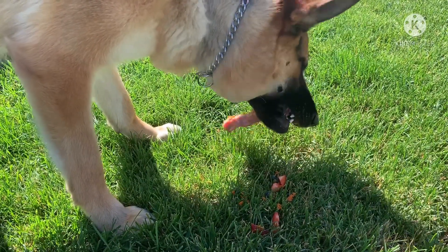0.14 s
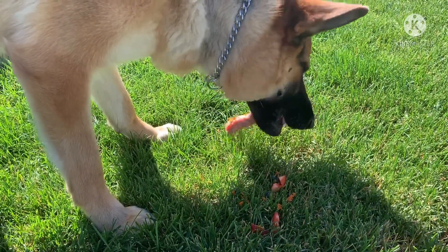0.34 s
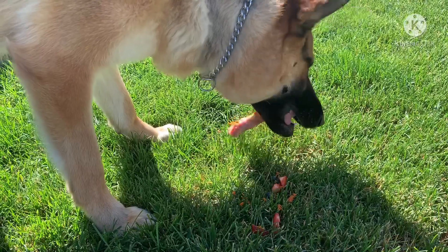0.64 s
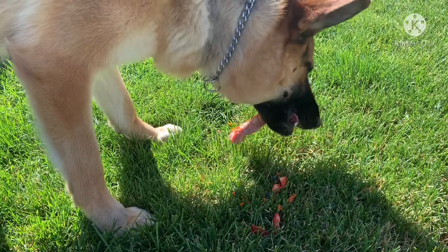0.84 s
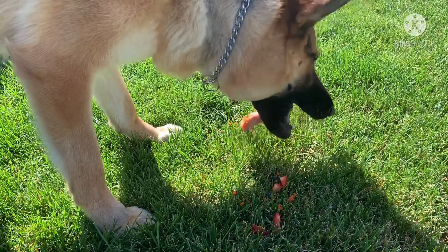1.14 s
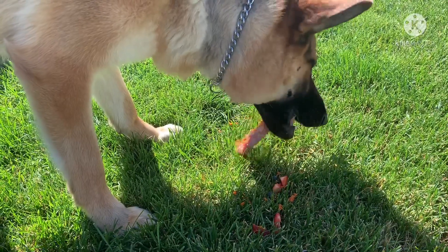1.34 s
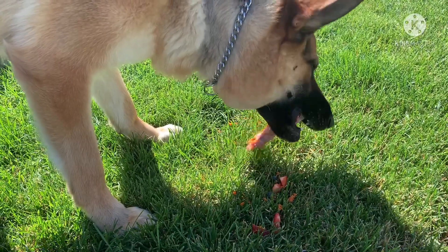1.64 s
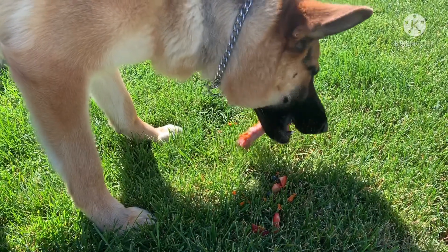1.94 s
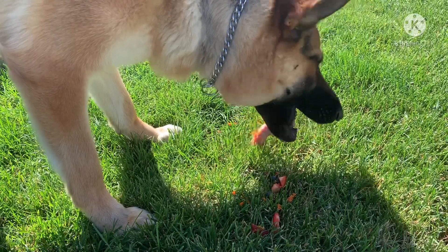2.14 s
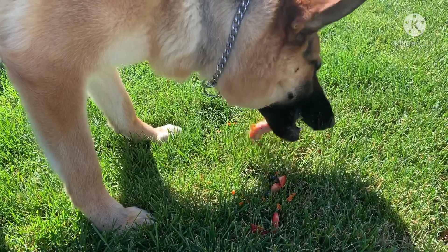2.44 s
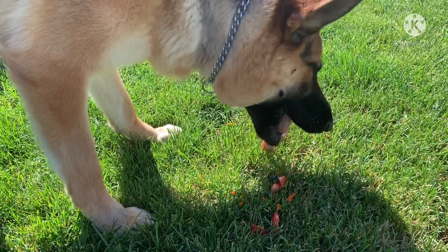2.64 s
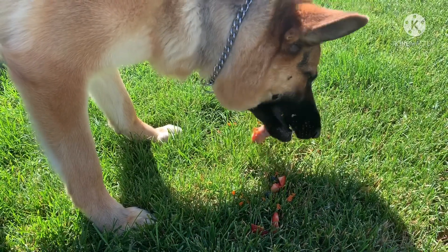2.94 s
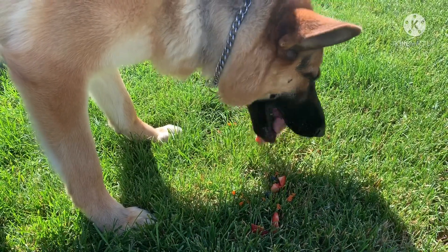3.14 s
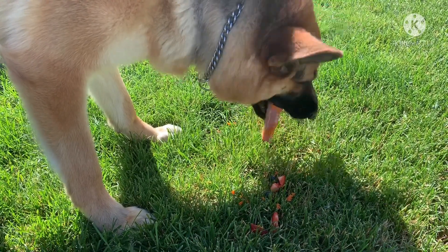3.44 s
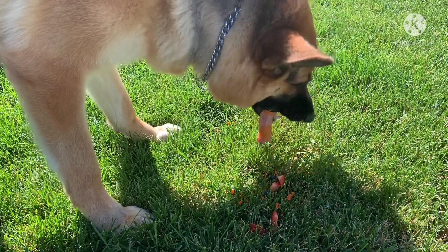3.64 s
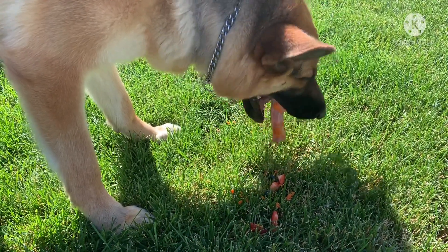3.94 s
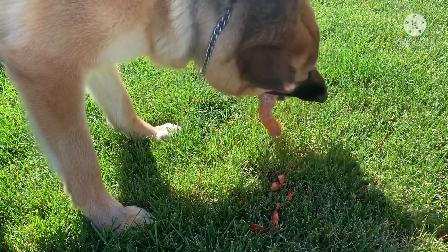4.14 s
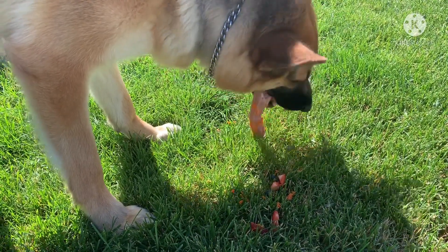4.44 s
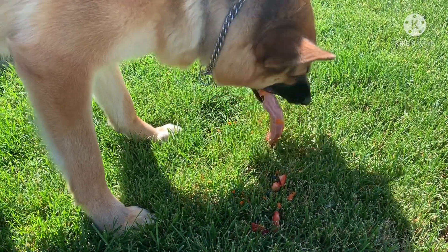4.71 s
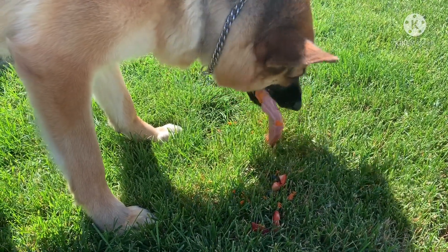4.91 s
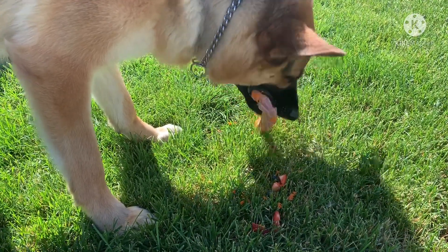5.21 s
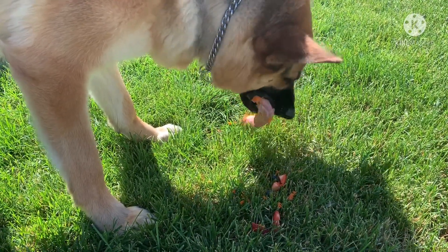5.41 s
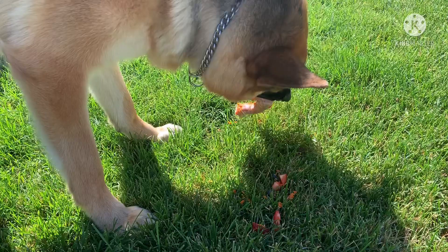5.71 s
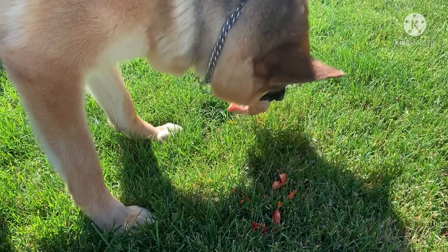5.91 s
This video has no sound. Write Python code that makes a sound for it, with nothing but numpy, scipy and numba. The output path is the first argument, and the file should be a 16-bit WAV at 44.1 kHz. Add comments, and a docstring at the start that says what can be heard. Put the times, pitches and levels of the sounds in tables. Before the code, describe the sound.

A dog chews raw meat up close with sharp crunches and wet smacks, while wind rumbles steadily on the microphone.

```python
"""Wind rumbles on a phone's two microphone ports while a dog, a metre away on a lawn, chews raw meat.
Each bite through gristle cracks and rings down in the closing mouth; splinters tick, wet flesh
squelches and air puffs through the nose. Single eddies slap the ports, and behind it all sit
the hum of a cooling unit and the wash of a suburb."""
import sys
import numpy as np
from scipy import signal
from scipy.fft import rfft, irfft, next_fast_len
from scipy.io import wavfile
from scipy.ndimage import uniform_filter1d
from numba import njit

SR = 44100
rng = np.random.default_rng(int(sys.argv[2]) if len(sys.argv) > 2 else 0)


def put_to_file(sound):
    """Save the sound as 16-bit audio at rate SR, in the file named by the first command-line argument."""
    columns = np.atleast_2d(sound).T  # one column per channel
    safe = np.clip(columns, -1, 1)
    whole_steps = np.round(safe * 32767)
    wavfile.write(sys.argv[1], SR, whole_steps.astype(np.int16))


N = 267545
T = np.arange(N) / SR
USUAL_DB = -35  # level of a usual bite and of the usual rumble


def undb(db):
    return 10 ** (np.asarray(db) / 20)


def unit(x):
    """Scale to rms 1."""
    return x / np.sqrt(np.mean(x ** 2))


def curves(table):
    """Columns of a table, joined by straight lines in time."""
    times, *columns = np.transpose(table)
    return [np.interp(T, times, column) for column in columns]


def over_hz(table, hz):
    """Read a (freq_hz, value) table on a log frequency axis."""
    freqs, values = np.transpose(table)
    return np.interp(np.log(hz), np.log(freqs), values)


def band(x, lo_hz, hi_hz, order=2):
    sos = signal.butter(order, [lo_hz, min(hi_hz, .45 * SR)], "bandpass", fs=SR, output="sos")
    return signal.sosfilt(sos, x)


def grains(shape, lo_hz, hi_hz):
    """Rows of band noise, one for each event."""
    return unit(band(rng.standard_normal(shape), lo_hz, hi_hz, order=3))


def stereo_noise(likeness):
    """Left and right noise, from unrelated (0) to identical (1)."""
    mid, side = rng.standard_normal((2, N))
    return np.sqrt((1 + likeness) / 2) * mid + np.sqrt((1 - likeness) / 2) * np.array([side, -side])


def walk(rate_hz):
    """Random levels held 1 / rate_hz seconds and smoothed twice; spread near 1."""
    hold = int(SR / rate_hz)
    steps = np.repeat(rng.standard_normal(N // hold + 1), hold)
    return 1.5 * uniform_filter1d(uniform_filter1d(steps, hold), hold)[:N]


def add(out, start_s, grain):
    """Mix a grain in at start_s."""
    i = int(start_s * SR)
    grain, i = grain[max(-i, 0):], max(i, 0)
    out[i:i + len(grain)] += grain[:len(out) - i]


@njit
def resonate(x, hz, width_hz):
    """State-variable band-pass whose centre moves."""
    y, band_state, low_state = np.empty(len(x)), 0., 0.
    for i in range(len(x)):
        g, damping = np.tan(np.pi * hz[i] / SR), width_hz / hz[i]
        v = (band_state + g * (x[i] - low_state)) / (1 + g * (g + damping))
        band_state, low_state = 2 * v - band_state, low_state + 2 * g * v
        y[i] = damping * v
    return y


def wind(gust_db=2.5, puff_db=3):
    """Eddies tumble over the ports: an uneven rumble, and a flutter that comes in puffs."""
    # strength of the wind on the ports: time_s, rumble_db
    gusts = [(0.0, -35), (0.49, -43), (0.52, -38.5), (0.67, -47), (0.78, -29.5), (0.81, -39), (1.25, -43),
             (1.28, -34.5), (1.37, -41), (1.9, -42), (2.3, -42), (2.6, -40), (2.85, -43.5), (3.02, -36.5),
             (3.2, -40.5), (3.51, -38), (3.6, -27), (3.7, -41), (4.09, -42), (4.17, -34), (4.22, -43.5),
             (4.49, -41.5), (4.81, -40.5), (4.88, -33), (4.93, -34), (5.02, -34), (5.05, -36.5),
             (5.17, -51), (5.27, -42.5), (6.07, -47)]
    rumble_db, = curves(gusts)
    pan_db = .3 + 1.5 * walk(12)  # left minus right
    low, high = stereo_noise(.78), stereo_noise(.6)
    rumble = unit(band(low, 43, 107, order=3)) * undb(rumble_db + gust_db * walk(14))
    flutter_db = -48 + .32 * (rumble_db - USUAL_DB)  # follows the gusts only a little
    flutter = unit(band(high, 92, 286)) * undb(flutter_db + puff_db * walk(40))
    return (rumble + flutter) * undb(np.array([pan_db, -pan_db]) / 2)


def suburb():
    """Far traffic and leaves: third-octave bands that swell together and flicker alone."""
    # tone of the wash before its tilt: freq_hz, relative_db
    spectrum = [(150, -2), (300, -3.5), (500, -7), (1000, -11.5), (2000, -19.5), (3000, -24.5),
                (4500, -24.5), (6300, -40), (7300, -56), (8800, -51.5), (11000, -49), (16000, -79)]
    # slow swell of the wash: time_s, level_db, tilt_db_per_octave
    swell = [(0, -52, 2.5), (.74, -50.5, 3), (2.33, -50.5, 1.3), (4.0, -54, 1), (6.07, -53.5, 1.05)]
    # how alike the wash is at the two ports: freq_hz, likeness (0-1)
    likeness = [(100, 1), (500, 0.98), (2000, 0.35), (2900, 0.3), (4500, 1), (16000, 1)]
    level_db, tilt_db = curves(swell)
    wash = 0
    for hz in 200 * 2 ** np.arange(0, 6.5, 1 / 3):
        noise = band(stereo_noise(over_hz(likeness, hz)), hz * 2 ** (-1 / 6), hz * 2 ** (1 / 6))
        flicker_db = 1.5 * walk(8) + 1.2 * walk(50)
        wash = wash + undb(over_hz(spectrum, hz) + tilt_db * np.log2(hz / 1000) + flicker_db) * noise
    return wash / np.std(band(wash, 187, 6500)) * undb(level_db)


def cooling_hum(waver_db=2.44):
    """A cooling unit's motor drones, wavering as the air moves, a little apart at the two ports."""
    # motor tones: pitch_hz, rms_db
    tones = [(119.8, -42.5), (240, -63.5), (275, -59.5), (360, -66)]
    drift = .7 * walk(12) + .5 * walk(4) * np.array([[1], [-1]])
    return sum(np.sqrt(2) * undb(db + waver_db * walk(12)) * np.sin(2 * np.pi * hz * T + drift)
               for hz, db in tones)


def squelch(pops_per_s=500, juicy_per_s=220, spread_db=2.5, smear_s=.0042, width_hz=480.):
    """Wet flesh bursts in tiny uneven pops: a bright fizz, and fewer juicy ones that ring the mouth."""
    # working of the jaws: time_s, fizz_db, juicy_db, mouth_hz
    chewing = [(0, -74, -62, 1710), (.25, -70, -72, 1760), (.45, -86, -70, 1660), (1.2, -80, -63, 1690),
               (1.65, -71.5, -61, 1810), (1.85, -67, -72, 1700), (1.95, -88, -86, 1600),
               (2.35, -71, -70, 1590), (2.55, -80, -63, 1420), (3.24, -78.5, -61, 1300),
               (3.55, -75, -60.5, 1250), (3.64, -71, -60, 1230), (3.76, -81, -51, 1200),
               (3.8, -84, -64.5, 1210), (4.35, -76.5, -62.5, 1490), (4.55, -82, -68, 1650),
               (4.68, -74, -62.5, 1760), (5.0, -79.5, -64.5, 1510), (6.07, -81.5, -66.5, 1380)]
    fizz_db, juicy_db, mouth_hz = curves(chewing)
    chance = rng.random(N)
    sizes = undb(spread_db * np.minimum(rng.exponential(size=N), 4))
    pops = (chance < pops_per_s / SR) * sizes
    pop_energy = signal.lfilter([1], [1, -np.exp(-1 / (smear_s * SR))], pops ** 2)
    noise = rng.standard_normal(N)
    hiss = band(noise, 7000, 16000, order=3) + .8 * band(noise, 8200, 9400)
    fizz = hiss * np.sqrt(pop_energy + 1e-12)
    mouth_hz = mouth_hz * (1 + .13 * walk(40))  # the tongue never rests
    juicy_pops = (chance < juicy_per_s / SR) * sizes
    juicy = resonate(resonate(juicy_pops, mouth_hz, width_hz), mouth_hz, 2 * width_hz)
    return undb(fizz_db) * unit(fizz) + undb(juicy_db) * unit(juicy)


def buffets(edge_db=-14, edge_ratio=1.72):
    """An eddy slaps both ports, one harder: a short thump of pressure with a sharper edge."""
    # single eddies: peak_s, level_db, pitch_hz, half_width_s
    slaps = [(0.022, -23, 93, 0.0056), (0.34, -45, 162, 0.015), (0.736, -26, 90.5, .006),
             (0.77, -23, 78.5, 0.0029), (1.273, -31, 204, 0.0023), (3.576, -25, 220, 0.0056),
             (3.591, -19.5, 94, 0.0051), (3.624, -36, 153, 0.008), (3.81, -28.5, 128, 0.0056),
             (4.015, -37, 149, 0.017), (4.157, -26, 106, 0.0059), (4.868, -40.5, 271, 0.011),
             (4.871, -27.5, 139, 0.0097), (4.881, -21, 82.5, 0.015), (4.914, -20.5, 75, 0.0061),
             (4.899, -29.5, 202, 0.0076), (4.94, -23, 71.6, 0.016), (4.97, -27, 152, 0.0082),
             (5.006, -26, 213, 0.0032), (5.031, -28, 95, 0.01), (5.052, -23, 68.4, 0.0092),
             (5.263, -36, 295, 0.0036), (5.27, -25, 181, 0.0026), (5.451, -35.5, 148, 0.0067),
             (5.51, -30.5, 139, 0.0054)]
    out, t = np.zeros(N), np.arange(-2000, 2000) / SR
    phases = rng.uniform(0, 2 * np.pi, len(slaps))
    for (peak_s, level_db, hz, half_width_s), phase in zip(slaps, phases):
        thump = np.exp(-(t / half_width_s) ** 2) * np.cos(2 * np.pi * hz * t + phase)
        edge = np.exp(-(2 * t / half_width_s) ** 2) * np.cos(2 * np.pi * edge_ratio * hz * t + phase)
        add(out, peak_s + t[0], undb(level_db) * (thump + undb(edge_db) * edge))
    lean_db = 3 * walk(30.02)
    return out * undb(np.array([lean_db, -lean_db]))


def bites(usual_t60_s=.015, linger_t60_s=.06, knock_t60_s=.024, glide_s=.0011, spread=.12):
    """Gristle fibres snap in a quick spray that rings the mouth, knocks the jaw and crumbles away."""
    # bites: peak_s, peak_db, ring_hz, pitch_drop (share of ring_hz; none if negative),
    # grit_db, knock_db (both relative to the ring)
    cracks = [(.0224, -37.5, 1697, 0.2, -12, -27), (.123, -32, 1910, -0.6, -29, -15),
              (.127, -32.5, 1693, -0.54, -32, -7.5), (0.166, -37, 2135, -2, 2, -16),
              (.197, -43, 1810, .3, -13, -20), (0.2193, -37, 1690, 0.28, -11, -18),
              (0.2214, -30, 550, .1, -17, -18), (.229, -30, 2810, 0.1, 6, -1),
              (.234, -35, 536, .1, -18, -18), (.2775, -32, 1883, 0.46, -6, -23),
              (.2822, -16.5, 1150, 1, -4.5, -9), (.2925, -43, 1426, 0.23, -15, -25),
              (.355, -39, 1200, 0.062, -4, -20), (.4759, -37.5, 1510, 0.48, -22, 3),
              (.601, -45, 2000, .1, -6, -20), (0.644, -30, 1106, 1.2, 6.5, -28),
              (0.84, -34, 1648, 0.3, -15, -8), (.808, -45, 1774, .3, 0, -20),
              (.876, -51, 1680, .3, -4, -20), (0.9688, -32.5, 1550, 0.4, -14, -23),
              (1.0347, -39.5, 1655, .04, -12, -23), (1.2073, -36, 1440, .17, 6, -22),
              (1.302, -44, 1525, .3, -9, -22), (1.3463, -40, 1586, -0.1, -10, -23),
              (1.6403, -33, 1983, 2, -2, -16), (1.785, -29.5, 2075, 0.2, -2, -19),
              (1.8092, -14.5, 1261, 0.85, -9, -17), (1.8108, -27, 678, .3, -16, -23),
              (1.8235, -40, 1750, 0, -15, -25), (1.82, -34, 1660, -1.5, 8, -17),
              (1.865, -38, 1610, 0.6, -12, -20), (1.887, -47, 1580, .1, -12, -20),
              (1.9555, -39.5, 1700, 0.45, -8, -20), (1.965, -43, 1723, -0.089, -10, -20),
              (2.1516, -46, 1750, -0.5, -11, -12), (2.199, -43.5, 2080, -0.5, -9, -9),
              (2.208, -43, 1490, 0.37, -8, -20), (2.24, -42, 1810, .2, -6, -20),
              (2.264, -38.5, 1660, 0.15, -2, -16), (2.2958, -25.5, 908, 1.5, -1.5, -3.5),
              (2.3353, -31.5, 800, 1.5, 1, -5), (2.3487, -21.5, 837, 1.4, -10, -7),
              (2.399, -34.5, 1830, .1, -5, -8), (2.4125, -31.5, 812, 0.078, -22, -14),
              (2.424, -35, 808, .1, -20, -20), (2.44, -46, 2900, -0.3, -10, -25),
              (2.4099, -21, 1680, 0.4, 4, -28), (2.4131, -15, 1506, .2, 0, -12),
              (2.8, -42, 1460, 0.19, -24, -18), (2.868, -41, 790, .2, -25, -6),
              (2.941, -46.5, 1440, 0.59, -15, -20), (3.041, -44, 1285, -0.066, -20, -18),
              (3.074, -47, 1510, .3, -8, -20), (3.124, -41, 850, .1, -18, -17),
              (3.189, -47, 1210, .6, -5, -4), (3.2785, -39.5, 1596, 0.3, -7, -24),
              (3.298, -43, 980, .96, 0, -21), (3.359, -46, 1190, -0.5, -21, -20),
              (3.499, -44, 1060, .09, -24, -20), (3.508, -46, 1197, .4, -15, -20),
              (3.587, -42, 1190, .3, -10, -20), (3.61, -40, 1390, .5, -12, -25),
              (3.6161, -30.5, 1180, 1.0, -9, -13), (3.634, -33, 1170, 1, -13, -27),
              (3.639, -35, 1192, .8, -11, -18), (3.622, -43, 1172, .3, -13, -20),
              (3.6458, -43, 1233, .1, -14, -20), (3.656, -54, 1230, .4, -6, -20),
              (3.643, -31.5, 1238, -1.7, -8, -19), (3.629, -50, 1920, .4, -5, -20),
              (3.665, -47, 1302, 0.64, -8, -20), (3.694, -48, 1254, .8, -8, -20),
              (3.737, -45, 1247, .5, -8, -20), (3.679, -39, 1520, 0.5, -7, -22),
              (3.6837, -37, 1237, .29, -13, -20), (3.688, -49, 1107, .5, -8, -20),
              (3.7035, -41, 2160, .1, -10, -25), (3.719, -43, 1297, .6, -10, -20),
              (3.7087, -32, 1152, 1.1, -14, -12), (3.73, -30, 1212, 1.1, -19, -8),
              (3.7572, -13, 1051, 1.2, -23, -8), (3.7587, -18.5, 847, .5, -9, -10.5),
              (3.754, -40, 2230, .1, -2, -22), (3.7617, -21, 266, 1.5, -22, -6),
              (3.763, -40, 1146, -0.7, -21, -4), (3.748, -35, 880, .3, -17, -10),
              (3.767, -32, 1137, .2, -22, -15), (3.775, -31, 1406, -0.073, -6, -27),
              (4.078, -36.5, 1241, 1, -3.5, -26), (4.125, -34, 1126, -0.46, -36, -29),
              (4.2767, -40.5, 1310, -0.5, -21, -16), (4.283, -45, 1860, -0.37, -21, -20),
              (4.2883, -42, 1600, .14, -21, -18), (4.303, -46, 1740, .1, -18, -20),
              (4.324, -46, 1190, .1, -10, -17), (4.3375, -43, 1685, 0.2, -15, -19),
              (4.244, -50, 1390, .1, -12, -20), (4.357, -43, 1880, .1, -4, -20),
              (4.37, -36.5, 1403, 1.03, 0, -30), (4.382, -44, 1930, .1, -9, -22),
              (4.397, -40.5, 1880, .26, 3, -23), (4.457, -42, 2770, .2, 4, -25),
              (4.469, -52, 1590, .1, -5, -20), (4.612, -43, 1560, .4, -13, -18),
              (4.627, -45, 1780, .3, -12, -20), (4.646, -47, 2000, 0.6, -15, -20),
              (4.665, -47, 1900, .1, -13, -20), (4.6397, -41, 1397, .23, -22, -22),
              (4.653, -43, 1910, .1, -13, -20), (4.657, -34.5, 1857, 0, -14, -12),
              (4.661, -44, 1970, .3, -12, -7), (4.671, -45, 1200, -0.11, -20, -20),
              (4.673, -51, 1900, -0.11, -20, -20), (4.698, -45, 2240, .3, 7, -20),
              (4.746, -43.5, 1366, .4, -5, -20), (4.788, -48, 1295, 0, -6, -20),
              (4.813, -40.5, 1810, -1.2, -16, -10), (5.165, -42, 1690, 0.5, -7, -20),
              (5.213, -45.5, 1910, .1, -15, -20), (5.3745, -45, 1290, 0.49, -15, -20),
              (5.3832, -35.5, 1170, 0.5, -12, -9), (5.421, -41, 1110, 0.2, -6, -17)]
    peak_s, peak_db, ring_hz, pitch_drop, grit_db, knock_db = np.transpose(cracks)[:, :, None]
    out, t = np.zeros(N), np.arange(-400, 2000) / SR
    shape, after = (len(cracks), len(t)), np.maximum(t, 0)
    force_db = peak_db - USUAL_DB
    decay_stray, shape_stray = np.exp(spread * rng.standard_normal((len(cracks), 2)).T[:, :, None])
    t60_s = usual_t60_s * decay_stray * undb(-.49 * force_db)  # harder bites close tighter, ring shorter
    rise_s = .001 * shape_stray
    attack = np.exp(-(np.minimum(t, 0) / rise_s) ** 2)
    # the cavity closes round the meat, so its note starts high and falls
    pitch_hz = ring_hz * (1 + np.clip(pitch_drop, 0, 2.5) * np.exp(-np.maximum(t + rise_s, 0) / glide_s))
    roughness = undb(.13 * force_db)  # soft smacks pop cleaner
    wobble = 1 + .25 * grains(shape, 100, 500)  # wet walls roughen the note
    phase = 2 * np.pi * np.cumsum(pitch_hz, axis=1) / SR + .35 * roughness * grains(shape, 149, 660)
    upper = undb(-15) * roughness * np.sin(1.45 * shape_stray * phase)  # a second, smaller pocket
    decay = undb(-60 * after / t60_s) + undb(-18 - 60 * after / linger_t60_s)
    ring = (np.sin(phase) + upper) * wobble * decay
    grit = grains(shape, 740, 4130) * undb(grit_db - 60 * after / (.99 * t60_s))
    # the jaw answers a moment later with a dull note that sags
    jaw_hz = 280 + 650 * np.exp(-after / .0027)
    thud = np.sin(2 * np.pi * np.cumsum(jaw_hz) / SR) + 1.28 * grains(shape, 206, 820)
    knock = thud * (1 - np.exp(-after / .002)) * undb(knock_db - 60 * after / knock_t60_s)
    crumble = grains(shape, 1030, 2270) * wobble * undb(-27) * np.exp(-after / .018)
    # the harder the bite, the more of a short broad snap of tooth on bone
    snap = grains(shape, 560, 4200) * undb(-8.66 + .68 * peak_db) * np.exp(-(after / .0015) ** 2)
    # fibres give a little before they break
    creak = grains(shape, 1130, 2700) * (t < 0) * undb(-21) * np.exp(-(t / .006) ** 2)
    sound = creak + attack * (ring + grit + snap + knock + crumble)
    sound *= undb(peak_db) / np.abs(sound).max(axis=1, keepdims=True)
    for start_s, bite in zip(peak_s[:, 0] + t[0], sound):
        add(out, start_s, bite)
    return out


def mouth_hollow(sound):
    """The open mouth rings on after each bite."""
    # resonance of the mouth: time_s, gain_db, pitch_hz
    hollow = [(0, 1, 1580), (1.8, -17, 1470), (2.3, -2, 1660), (2.45, -11, 1620), (3.55, 3, 1200),
              (3.74, -1, 1190), (3.76, -4, 1230), (4.2, -0.5, 1210), (6.07, -12, 1290)]
    gain_db, pitch_hz = curves(hollow)
    return sound + undb(gain_db) * resonate(sound, pitch_hz, width_hz=110.)


def ticks(rise_s=.00077, half_width_s=.00086, spray_s=.018, soft_db=-60):
    """Splinters and wet smacks: bright bursts of a millisecond or so, with a sputtering spray behind."""
    # ticks: start_s, level_db (of the bright band), top_db, dull_db (both relative to that band)
    splinters = [(0.022, -44, -16, -13), (0.061, -50, -19, 1), (0.164, -50, -2, 6.5), (0.2295, -57.5, 4, 1),
                 (0.2822, -38.5, 5.5, 2), (0.292, -46, -10, -3), (0.36, -46.5, -12, -22),
                 (0.377, -56, 5, -6), (0.386, -61.5, -4, 12), (0.4644, -70, 9, 0), (0.6419, -67, 4, 5),
                 (0.7652, -57, 6, -2), (.772, -65, -10, 13), (.81, -68, -10, 11), (0.839, -44, -6, -1),
                 (0.96, -57.5, -1, 6), (0.969, -56, 3, 2), (1.166, -59, -14, 6), (1.19, -62, -17, 9),
                 (1.51, -63.5, -19, 10), (1.5951, -60, -29, -11), (1.621, -49, -6, -4),
                 (1.6417, -46, -9, -1), (1.72, -57.5, -5, 12.5), (1.7842, -43, -4, 6),
                 (1.807, -35.5, -3, 4), (1.822, -48, -6, -11), (2.142, -63.5, -12, 6),
                 (2.2618, -67, -13, 10.5), (2.2964, -62, -9, 9), (2.3343, -47, -7, 0), (2.3474, -42, -5, 4),
                 (2.3643, -51, -10, 11), (2.3745, -49, -6, 1), (2.4085, -48, -5, -1),
                 (2.4112, -31.5, -8, 1), (2.4214, -61, -6, -1), (2.9238, -66, -15, -10),
                 (2.929, -64, -10, -8), (2.95, -60.5, 12, -21), (2.954, -59, 3, -15), (2.9774, -70, -8, -4),
                 (3.0398, -63, -4, 4), (3.072, -60, -12, -11), (3.0765, -60, 1, -8), (3.171, -65, -8, -2),
                 (3.262, -71, -10, 15), (3.271, -71, -10, 15), (3.279, -72, -10, 12), (3.2925, -64, 0, 4),
                 (3.384, -72, -10, 20), (3.5068, -55.5, -8, 2), (3.5532, -66, -4, -2), (3.576, -58, -16, 5),
                 (3.6004, -52.5, -4, 8.5), (3.6153, -41, -2, -8), (3.6338, -36.5, -5, -3),
                 (3.64, -40, -4, -8), (3.681, -58, 1, -6), (3.703, -55, -4, -9), (3.707, -67, -5, 1),
                 (3.729, -45.5, 3, -13), (3.7575, -34.5, 2, -22), (3.7654, -57, -10, -9),
                 (3.775, -59, -13, 6), (3.982, -72, 5, -8), (4.076, -69, -8, -7), (4.0894, -71, -2, -2),
                 (4.3618, -65, 5, -1), (4.3695, -65, -4, -4), (4.4761, -68, 2, -4), (4.577, -67, -5, -19),
                 (4.6395, -66, -10, 10), (4.657, -68, -10, 12), (4.671, -71, -10, 15), (4.7445, -65, 7, -4),
                 (4.7735, -53, -1, -1.5), (4.787, -58, -7, -9), (4.8526, -56, -1, 3), (4.86, -63, -13, -3),
                 (4.894, -55, -19, -6), (5.0377, -63.5, 6, -11), (5.141, -57, -24, 8.5),
                 (5.152, -60, -22, 4), (5.214, -64, 2, -3), (5.253, -60, 2, -14), (5.365, -66, -10, 3),
                 (5.381, -62, -12, -1), (5.388, -48.5, -19, -4), (5.5024, -64, -9, -4),
                 (5.653, -66, -12, 3), (5.77, -63, -9, -11)]
    start_s, level_db, top_db, dull_db = np.transpose(splinters)[:, :, None]
    out, t = np.zeros(N), np.arange(-250, 2150) / SR - rise_s
    shape = (len(splinters), len(t))
    sputter = undb(5 * grains(shape, 100, 600))
    widths_s = half_width_s * np.exp(.29 * rng.standard_normal(start_s.shape))
    burst = np.exp(-(t / widths_s) ** 2)
    spray_db = -18 - .35 * np.maximum(level_db - soft_db, 0)  # louder ticks are drier
    spray = (1 - burst) * (t > 0) * undb(spray_db) * sputter * np.exp(-t / spray_s)
    bright = grains(shape, 7900, 11500)
    top = undb(top_db) * grains(shape, 11500, 15300)
    dull = undb(dull_db) * grains(shape, 3800, 7300)
    bright_rms = np.linalg.norm(burst * bright, axis=1) / np.linalg.norm(burst, axis=1)
    sound = (burst + spray) * (bright + top + dull) * undb(level_db) / bright_rms[:, None]
    for peak_s, tick in zip(start_s[:, 0] + rise_s, sound):
        add(out, peak_s + t[0], tick)
    return out


def snuffles(nostril_hz=6090, whistle_db=-5.5):
    """Air hisses through the nostrils in short puffs, with a wet whistle in them."""
    # puffs of breath: peak_s, level_db, half_width_s
    puffs = [(0.127, -48.5, 0.013), (0.693, -61, 0.029), (0.803, -62, 0.027), (1.176, -59.5, 0.034),
             (1.301, -62, 0.022), (1.555, -58.5, 0.033), (1.83, -54, 0.044), (2.167, -69, .03),
             (2.427, -55.5, 0.053), (2.704, -60, 0.057), (3.395, -66, 0.023), (3.616, -58.5, 0.055),
             (4.284, -62, 0.017), (4.364, -68, 0.03), (4.533, -67, 0.022), (4.658, -63.5, 0.017),
             (4.82, -64.5, 0.087), (5.151, -56, 0.0076), (5.383, -64, 0.014), (5.676, -64, 0.035)]
    flow, t = np.zeros(N), np.arange(-6000, 6000) / SR
    for peak_s, level_db, half_width_s in puffs:
        add(flow, peak_s + t[0], undb(level_db) * np.exp(-(t / half_width_s) ** 2))
    air = rng.standard_normal(N)
    hiss = unit(band(air, 2800, 5640, order=3))
    whistle_hz = nostril_hz * (1 + .057 * walk(25.05))  # the nostrils narrow and widen
    whistle = unit(resonate(air, whistle_hz, width_hz=700.))
    return flow * undb(3.5 * walk(120)) * unit(hiss + undb(whistle_db) * whistle)


def nearby_scatter(sound, echo_db=-13, decay_s=.003):
    """Grass, legs and the hand scatter a short smear, different at each port."""
    t = np.arange(1200) / SR
    smear = rng.standard_normal((2, len(t))) * np.exp(-t / decay_s)
    smear *= undb(echo_db) / np.linalg.norm(smear, axis=1, keepdims=True)
    return sound + signal.fftconvolve(sound[None], smear, axes=1)[:, :N]


def scene():
    """The dog up close, wind on the ports, suburb and hum behind."""
    dog = mouth_hollow(bites()) + ticks() + squelch() + snuffles()
    return nearby_scatter(dog) + wind() + buffets() + suburb() + cooling_hum()


def record(dry, stop_hz=17000):
    """The phone's stereo processing turns the phase of the right channel against the left, more so in the
    treble; the very top is cut."""
    # phase set between the channels by the stereo processing: freq_hz, right_lead_rad
    stereo_phase = [(0, 0), (500, .5), (1200, .8), (1900, .5), (2500, -.3), (3100, -1.6), (4700, -np.pi),
                    (17600, -7 * np.pi)]
    freq_hz, right_lead_rad = np.transpose(stereo_phase)
    size = next_fast_len(N + 4096)
    half_lead = np.interp(np.fft.rfftfreq(size, 1 / SR), freq_hz, right_lead_rad) / 2
    wide = irfft(rfft(dry, size) * np.exp(1j * np.array([-half_lead, half_lead])), size)[:, :N]
    return signal.sosfilt(signal.cheby2(10, 50, stop_hz, fs=SR, output="sos"), wide)


dry = scene()
out = record(dry)
put_to_file(out)
```